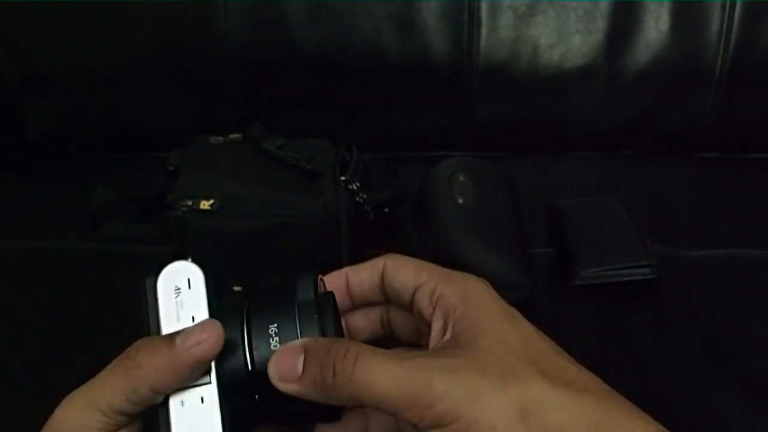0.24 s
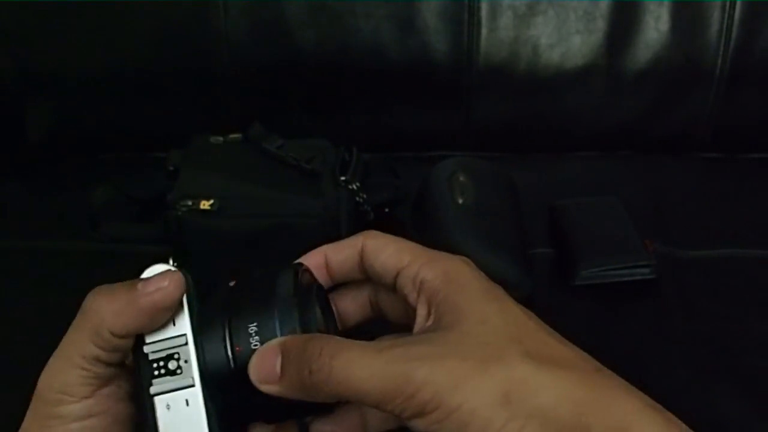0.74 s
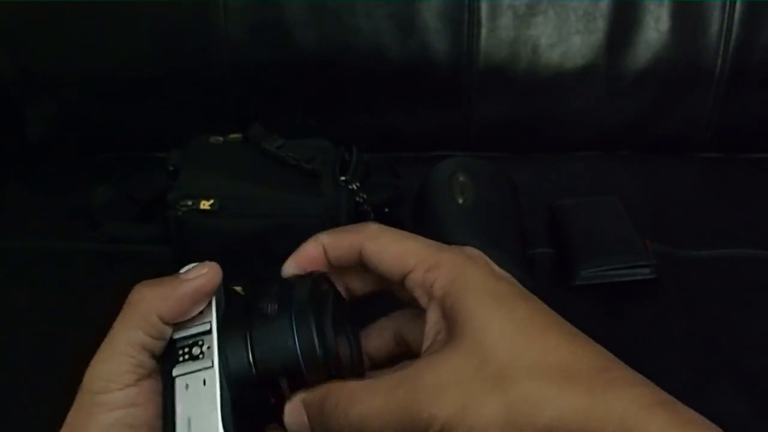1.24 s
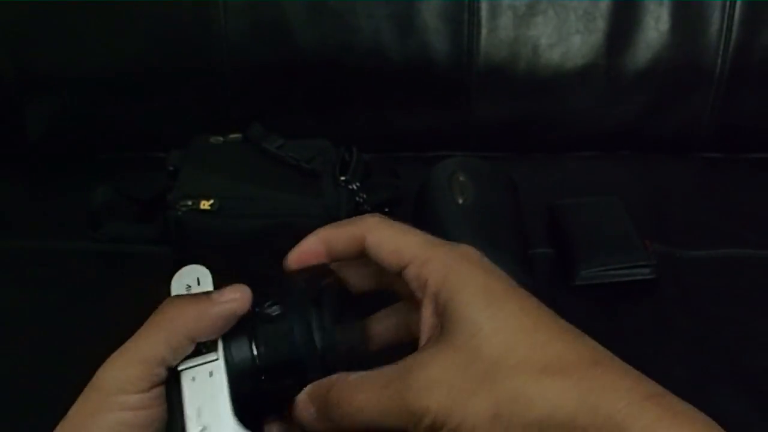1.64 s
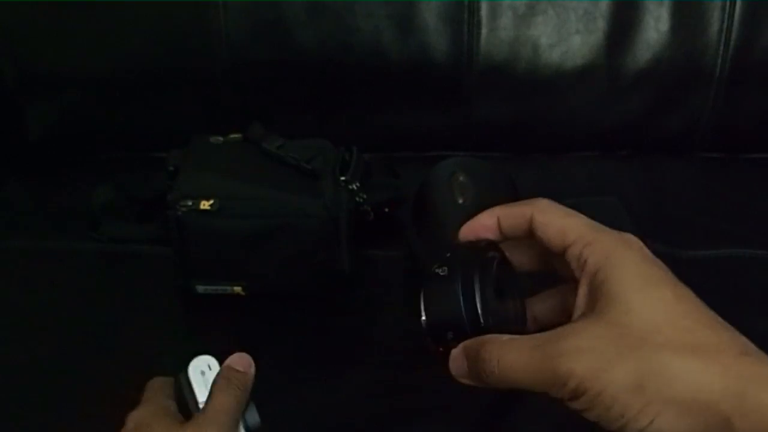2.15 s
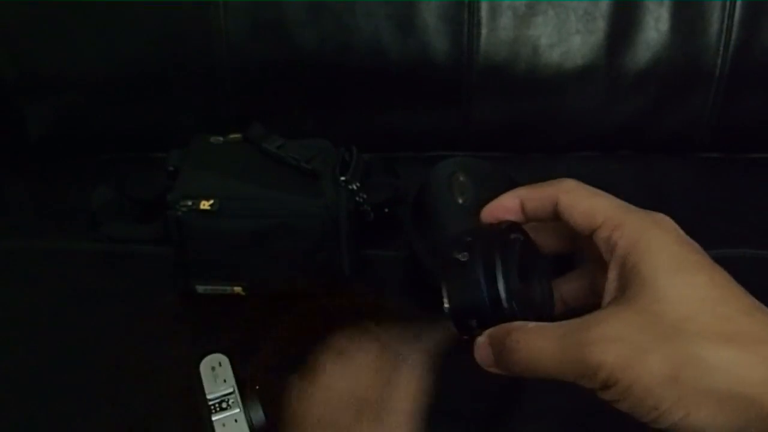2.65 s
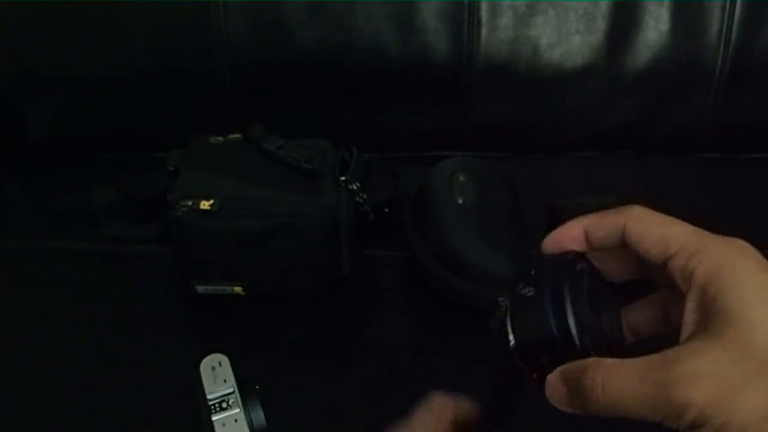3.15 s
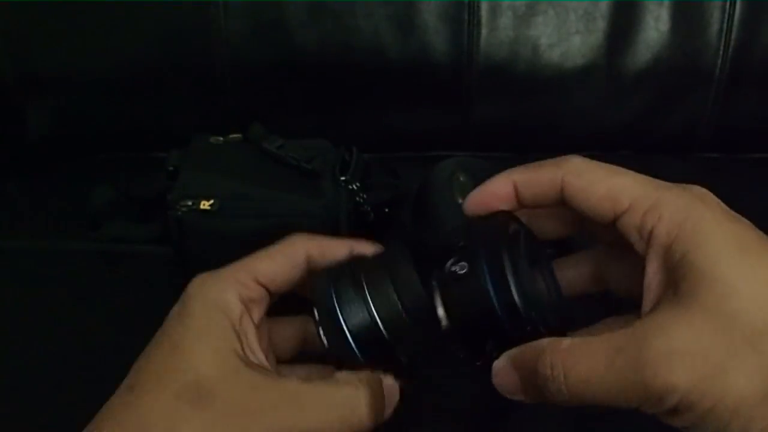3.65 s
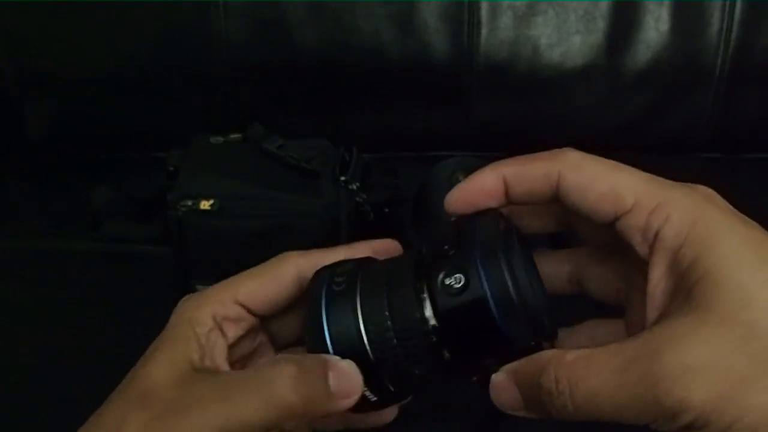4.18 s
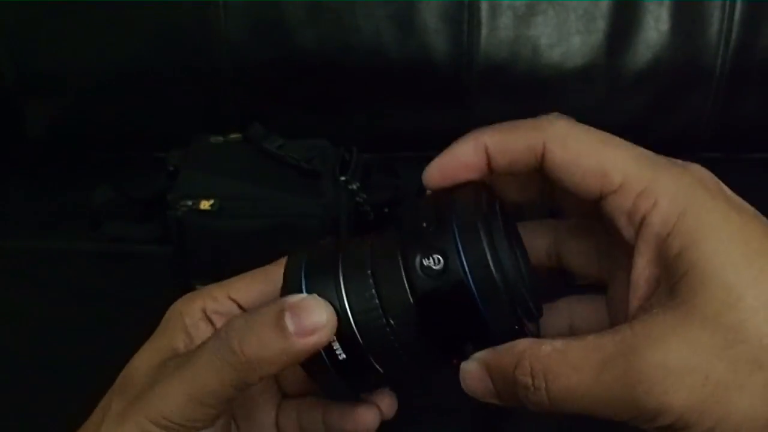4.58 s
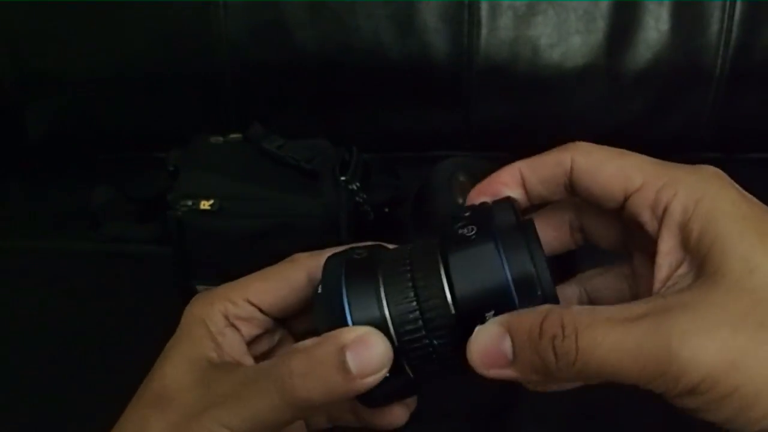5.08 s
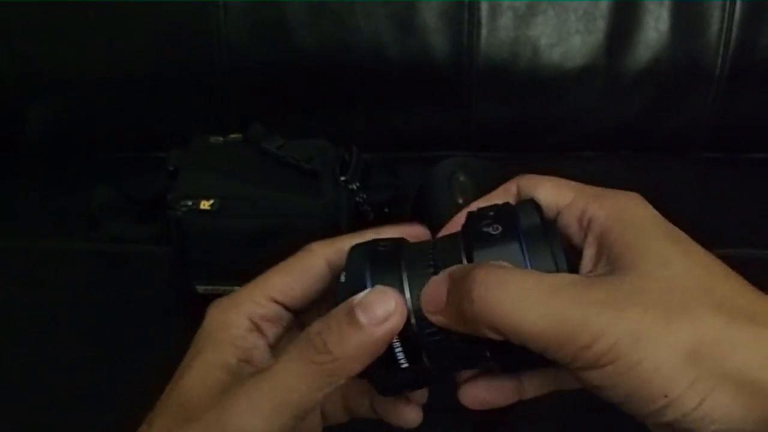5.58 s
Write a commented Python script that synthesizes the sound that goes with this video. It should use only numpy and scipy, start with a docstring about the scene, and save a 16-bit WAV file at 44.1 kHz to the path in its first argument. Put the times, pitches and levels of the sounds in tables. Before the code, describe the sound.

A faint fan and steady air fill a small room, heard in stereo from about an arm's length. Hands work a camera lens: light ticks and finger rubs, then a faint, rough, falling squeak around 0.4 seconds. The tight mount ticks as it slips, clicks near 0.9 and 1.2 seconds, and releases with a cluster of sharp clacks at about 1.6. Soft bumps on a sofa cushion and a few small clicks follow until about 3 seconds. At 3.25 the lens clacks sharply against a second barrel, and the metal rings slide with a faint hiss and scrape from 3.5 to 4. A quick run of clicks with tiny spring pings leads to the loudest snap at 4.4 seconds as it locks. Faint rubbing and light ticks continue until about 5.8. Each knock leaves a short room tail.

```python
"""A small, quiet room with a sofa and a faint fan; a stereo microphone about an arm's length from the hands.
They twist a lens off a small camera, lay the body on the cushion and lock the lens onto a second barrel.
Bayonet lugs and a sprung catch click, clack and ping, fingers rub the grips, the tight twist squeaks
and the metal rings hiss as they slide on each other. The room answers each knock with a short tail."""
import sys
import numpy as np
from scipy import signal
from scipy.fft import rfft, irfft, next_fast_len
from scipy.io import wavfile
from scipy.ndimage import map_coordinates

SR = 44100
rng = np.random.default_rng(int(sys.argv[2]) if len(sys.argv) > 2 else 0)


def file_out(sig):
    """Save sig as 16-bit WAV at sys.argv[1]."""
    # one column per channel
    cols = np.atleast_2d(sig).T
    # limit, then scale
    lim = np.clip(cols, -1, 1)
    pcm = np.round(lim * 32767).astype(np.int16)
    wavfile.write(sys.argv[1], SR, pcm)


N = 256662

# single contacts of lugs, catch and barrels: t/s, relative level/dB, brightness/(dB/octave), crack t60/s
CLICKS = [(0.2554, -40.5, 3, .012), (0.3047, -39, -1.5, 0.017), (0.3328, -41.5, -2.5, .016),
          (0.803, -36.5, 9.5, 0.017), (1.2008, -30.5, 4, 0.031), (1.2433, -34, 3, 0.045),
          (1.5547, -16, 2, 0.035), (1.5825, -20.5, 2, 0.018), (1.8103, -43.5, 1, 0.018),
          (2.0237, -38, -4, 0.026), (2.0375, -30, 2.5, 0.048), (2.1707, -48, -5, 0.024),
          (3.015, -41.5, -4, 0.017), (3.249, -13, -0.5, 0.037), (3.2754, -24.5, 2, 0.014),
          (4.0237, -25.5, -1, .016), (4.0458, -32, -2, 0.014), (4.0863, -20.5, 3, 0.017),
          (4.1025, -35, -6.5, 0.018), (4.1672, -19.5, 1, 0.02), (4.41, -19, -2, 0.0033),
          (4.4127, -8, 0, 0.013), (4.4429, -33, 2, 0.007), (4.72, -39.5, 5, .018),
          (5.1587, -38.5, 0.5, .029), (5.3418, -46.5, -1.5, 0.018), (5.7395, -40.5, -1, 0.024),
          (5.7617, -38.5, 0.5, 0.028)]
# a part skips over its seat: the same four columns, then count, gap/s, loss per skip/dB
SKIPS = [(0.9034, -27, 9, 0.036, 2, 0.011, 4), (1.1481, -27.5, 1.5, 0.053, 3, 0.0066, 2.5),
         (1.5916, -19, 4, 0.037, 4, .0045, 1.1), (3.3317, -32, -2, .028, 2, 0.0057, -2.5),
         (3.9914, -18.5, -2, 0.03, 3, .0108, 6.5), (4.4562, -20.5, -0.5, 0.0073, 2, 0.0087, -0.5),
         (5.7784, -30.5, -2, 0.025, 3, 0.0053, 4.5)]
# the tight bayonet sticks and slips: t/s
SLIP_TIMES = [0.5776, 0.6202, 0.632, 0.6443, 0.662, 0.6832, 0.7311, 0.7553]
# how strongly each part speaks in the registers: knock/dB, ring/dB, tock/dB, clack/dB, tick/dB
CAMERA_VOICE = (-32.5, -19, -24, -23, -32.5)
BARREL_VOICE = (-36.5, -20.5, -22, -23, -26)
SLIP_VOICE = (-47, -29.5, -23, -21, -34)
SWAP_S = 2.5  # the hands go from the camera to the barrels


def bayonet_hits(slip_db=-43, growth_db_per_s=92, slip_t60=0.011):
    """Lugs click, skip and slip harder as the twist builds: t/s, level/dB, brightness, t60/s, voice."""
    hits = list(CLICKS)
    for s, db, bright, t60, count, gap, loss in SKIPS:
        hits += [(s + k * gap, db - k * loss, bright, t60) for k in range(round(count))]
    slips = [(s, slip_db + growth_db_per_s * (s - SLIP_TIMES[0]), 0, slip_t60, SLIP_VOICE)
             for s in SLIP_TIMES]
    return [(*hit, CAMERA_VOICE if hit[0] < SWAP_S else BARREL_VOICE) for hit in hits] + slips


# modes of the camera with its lens, and of the two joined barrels: f/Hz, relative level/dB, t60/s
CAMERA_MODES = [(426, 5.5, 0.0082), (910, -9.5, 0.016), (1080, 0, 0.016), (1211, -16, 0.086),
                (2290, 2, 0.014), (3080, 1.5, 0.008), (3490, -2, 0.014), (4020, -0.5, 0.012)]
BARREL_MODES = [(389, -20.5, 0.072), (660, -5, 0.026), (1040, -6, 0.029), (1144, -20, 0.087),
                (1330, -20.5, 0.025), (2003, -6.5, 0.034), (3020, -4.5, 0.014), (4190, -12.5, 0.023),
                (4324, -9, 0.053), (5160, -7.5, 0.016), (8370, -15, 0.01)]
# knock, ring, tock, clack and tick registers: low f/Hz, high f/Hz
REGISTERS = [(220, 590), (830, 1420), (1600, 2550), (2900, 5700), (5700, 17000)]


def bayonet(pivot_hz=4000, delay_s=.0006, port_lag_s=.000014):
    """Clicks and clacks at arm's length: blunt ones favour the low registers, sharp ones the treble."""
    out, t, tails = np.zeros((2, N)), np.arange(SR // 20) / SR, room_tails()
    bands = [signal.butter(3, edges, 'band', fs=SR, output='sos') for edges in REGISTERS]
    octaves = np.log2(np.array(REGISTERS) / pivot_hz).mean(axis=1)
    for s, db, bright, t60, voice in bayonet_hits():
        body, side = (CAMERA_MODES, -1) if s < SWAP_S else (BARREL_MODES, 1)
        blow = strike(body, t, t60)
        levels = db + np.array(voice) + bright * octaves
        click = sum(amp(level) * unit(signal.sosfilt(band, blow)) for band, level in zip(bands, levels))
        # the camera reaches the left microphone port first, the barrels the right
        pair = filtered(click, lambda hz: np.exp(1j * np.pi * side * port_lag_s * np.outer([-1, 1], hz)))
        add(out, s + delay_s, in_room(pair, tails, tail_db=-8, early_db=-14.5))
    return out


# spectrum of a hard contact: f/Hz, relative level/dB
CRACK_SPECTRUM = [(100, -9), (320, -2.5), (620, 9.5), (1000, 3), (2500, 8.5), (4600, 2), (6500, 2.5),
                  (8500, 3.5), (12500, -1.5), (16000, -7.5)]
# close sound at the microphone: f/Hz, left-right likeness/0-1
NEAR_LIKENESS = [(300, .99), (1200, 0.95), (3000, 0.72), (8000, 0.63), (15000, 0.84)]


def strike(body, t, crack_t60, snap_t60=0.0016, rattle_t60=0.44, rise_s=0.0001):
    """One contact: a hard snap, a short crack, a fine rattle of loose parts and the ring of the body."""
    snap = amp(13 - 60 * t / snap_t60)
    crack = amp(2 - 60 * t / crack_t60)
    rattle = amp(-23 - 60 * t / rattle_t60)
    ring = ringing(body, t)
    burst = (snap + crack + rattle) * noise(CRACK_SPECTRUM, NEAR_LIKENESS, len(t))
    return (ring + burst) * (1 - np.exp(-t / rise_s))


def ringing(modes, t, detune=0.032):
    """Damped modes whose pitch and strength shift a little with the grip."""
    hz, db, t60 = np.transpose(modes)[:, :, None]
    shift, strength = rng.standard_normal((2, len(modes), 1))
    decay = amp(db + 2 * strength - 60 * t / t60)
    return np.sum(decay * np.sin(2 * np.pi * hz * (1 + detune * shift) * t), axis=0)


# sprung parts letting go or snapping home: t/s, f/Hz, level/dB, t60/s
SPRING_PINGS = [(0.906, 2740, -55, .03), (0.915, 5540, -28.5, 0.029), (3.993, 2900, -23, 0.024),
                (4.087, 2420, -25, 0.031), (4.169, 4150, -29, 0.01), (4.413, 712, -30, 0.037),
                (4.413, 4460, -20.5, 0.028), (4.413, 5240, -47, 0.017), (5.342, 4050, -45, 0.023),
                (5.343, 5370, -48, .03)]


def springs():
    """Sprung catches give a brief, buzzing ping."""
    out, t, tails = np.zeros((2, N)), np.arange(SR // 10) / SR, room_tails(count=3)
    buzz = wobble(700)
    for s, hz, db, t60 in SPRING_PINGS:
        phase = 2 * np.pi * hz * t + buzz[round(s * SR):][:len(t)]
        ping = amp(db - 60 * t / t60) * np.sin(phase)
        add(out, s, in_room(ping, tails, tail_db=-13, early_db=-12))
    return out


# mount rings sliding on each other: t/s, hold/s, relative level/dB, scrape over hiss/dB
RING_SLIDES = [(3.565, 0.0068, -50.5, -1.5), (3.643, 0.033, -47.5, 5), (3.766, 0.012, -60, 8.5),
               (3.836, 0.026, -53, 1), (3.973, 0.057, -47, 3), (5.178, 0.11, -60.5, -13)]
# resonances of the rings: f/Hz, width/Hz, relative level/dB
RING_RESONANCES = [(5710, 45, 12), (7860, 130, 6), (8600, 92, 6), (10000, 120, 0), (12000, 130, 3),
                   (14100, 200, 8)]
# spectra of their hiss and scrape: f/Hz, relative level/dB
HISS_SPECTRUM = [(3000, -15), (5500, -6), (7000, -4), (8000, 2), (8700, -5), (9700, -4), (12000, -8),
                 (14200, -14), (16000, -25)]
SCRAPE_SPECTRUM = [(200, -11), (700, -11), (1050, 3.5), (1700, 1.5), (2100, -9), (2500, 2), (3000, -4),
                   (4300, -8.5), (7000, -43)]


def mount_rings(hiss_db=-1, sheen_db=-2, scrape_db=-1, attack=0.046, release=0.067):
    """Metal faces hiss and sing as they slide, and scrape through the barrel when pressed."""
    speed = sum(stroke(s, hold, db, attack, release) for s, hold, db, _ in RING_SLIDES)
    pressure = sum(stroke(s, hold, db + scrape + scrape_db, attack, release)
                   for s, hold, db, scrape in RING_SLIDES)
    # as the point of contact wanders, the resonances fade in and out
    sheen = unit(friction(RING_RESONANCES, grain_db=3, rate=600) * amp(3 * wobble(20)))
    metal = amp(hiss_db) * noise(HISS_SPECTRUM, DIFFUSE_LIKENESS, N) + amp(sheen_db) * sheen
    grit = unit(amp(3 * wobble(900)))
    return grit * (speed * metal + pressure * noise(SCRAPE_SPECTRUM, DIFFUSE_LIKENESS, N))


# fingers on the grips: t/s, hold/s, relative level/dB
FINGER_RUBS = [(0.236, 0.012, -51), (0.576, 0.073, -53), (1.408, 0.0061, -47.5), (1.555, 0.0074, -35),
               (2.197, .025, -49), (2.982, 0.081, -55), (5.162, 0.17, -55), (5.757, .05, -50.5)]
# spectrum of rubbing skin: f/Hz, relative level/dB
SKIN_SPECTRUM = [(200, -22), (700, -6), (1150, 9.5), (1700, 7), (2600, 2.5), (3600, 5.5), (5200, 0),
                 (8500, -3.5), (13000, -13), (16000, -13)]


def fingers(gain_db=-3, grain_db=3):
    """Skin catches and slips on the ribbed grips."""
    pressure = sum(stroke(s, hold, db, attack=0.018, release=0.061) for s, hold, db in FINGER_RUBS)
    skin = noise(SKIN_SPECTRUM, DIFFUSE_LIKENESS, N) * amp(grain_db * wobble(350))
    return amp(gain_db) * pressure * unit(skin)


def squeak(at_s=.42, pitch_hz=3670, sag_hz_per_s=2300, jitter=0.03, attack=0.14, release=0.23):
    """As the lens starts to turn, the tight grip gives a rough, falling squeak over a dry rub."""
    hz = pitch_hz - sag_hz_per_s * np.clip(np.arange(N) / SR - at_s, -attack, release)
    tone = np.array([wobble(300) * np.sin(2 * np.pi * np.cumsum(hz * (1 + jitter * wobble(900))) / SR)
                     for _ in range(2)])
    rub = friction([(1170, 190, -4), (3360, 950, -13), (4600, 280, -11)], grain_db=1.5, rate=400)
    twist = stroke(at_s, hold=0.059, db=-53.5, attack=attack, release=release)
    return twist * (amp(-4) * unit(tone) + amp(-2) * rub)


def friction(resonances, grain_db, rate):
    """Uneven micro-slips, rms 1, sounding through resonances: f/Hz, width/Hz, relative level/dB."""
    slips = noise(CRACK_SPECTRUM, DIFFUSE_LIKENESS, N) * amp(grain_db * wobble(rate))
    power = lambda f: sum(amp(2 * db) / (1 + ((f - hz) / width) ** 2) ** 2 for hz, width, db in resonances)
    return unit(filtered(slips, lambda f: np.sqrt(power(f))))


# camera and lenses bump on cushion or palm: t/s, relative level/dB
SOFT_BUMPS = [(1.665, -45.5), (1.781, -39.5), (1.832, -48), (2.044, -57), (2.091, -50.5), (2.172, -47.5),
              (2.814, -52.5), (2.861, -52), (5.78, -47)]
# modes of the camera body on the cushion: f/Hz, relative level/dB, t60/s
THUD_MODES = [(204, -11, 0.072), (316, -6.5, 0.043), (371, 8, 0.019), (455, -6.5, 0.043)]


def bumps(rise_s=0.0061, gain_db=-11):
    """The cushioned body thuds with a few low, damped modes."""
    out, t, tails = np.zeros((2, N)), np.arange(SR // 10) / SR, room_tails(count=3)
    for s, db in SOFT_BUMPS:
        thud = ringing(THUD_MODES, t, detune=0.084) * (1 - np.exp(-t / rise_s))
        add(out, s, in_room(amp(db + gain_db) * unit(thud), tails, tail_db=-5.5, early_db=-18))
    return out


# hand and camera press on the sofa: t/s, hold/s, relative level/dB
CUSHION_PRESSES = [(1.65, 0.23, -70.5), (2.02, 0.038, -52.5), (2.816, .04, -57)]


def cushion(gain_db=-2):
    """The upholstery gives way with a low, lumpy rumble."""
    weight = sum(stroke(s, hold, db, attack=.05, release=0.18) for s, hold, db in CUSHION_PRESSES)
    rumble = friction([(101, 20, 7), (184, 50, 2.5), (348, 66, -3)], grain_db=7, rate=13)
    return amp(gain_db) * weight * rumble


def in_room(x, tails, tail_db, early_db, early_t60=0.22, gap_s=0.0038):
    """The microphone hears the direct sound, the quick answer of nearby furniture and the room's tail."""
    tail = tails[rng.integers(len(tails))]
    t, size = np.arange(tail.shape[1]) / SR, SR // 8
    arrive = np.clip(t / gap_s - 1, 0, 1)
    answer = amp(tail_db) * unit(tail * arrive) / np.sqrt(len(t))
    early = noise(CRACK_SPECTRUM, NEAR_LIKENESS, size) * amp(-60 * t[:size] / early_t60) * arrive[:size]
    answer[:, :size] += amp(early_db) * unit(early) / np.sqrt(size)
    answer[:, 0] += 1  # the direct path
    return signal.fftconvolve(np.atleast_2d(x), answer, axes=1)


# colour of the room's tail: f/Hz, relative level/dB
ROOM_SPECTRUM = [(100, -2), (400, 1), (720, -9.5), (980, -4.5), (1170, 4.5), (1450, 5), (2100, -1),
                 (3000, 0.5), (4400, -0.5), (8000, 2), (15000, 3)]
# its decay: f/Hz, t60/s
ROOM_DECAY = [(200, 0.46), (550, 1), (1200, 0.74), (3700, 0.65), (9700, 0.5), (15000, 0.38)]
# diffuse sound at the microphone: f/Hz, left-right likeness/0-1
DIFFUSE_LIKENESS = [(60, 0.59), (300, 0.72), (700, 0.63), (1400, 0.23), (3000, 0.098), (7000, 0.094)]


def room_tails(count=8):
    """A few random variants of the room's diffuse tail; each frequency dies at its own speed."""
    washes = [noise(ROOM_SPECTRUM, DIFFUSE_LIKENESS, SR * 2 // 3) for _ in range(count)]
    hz, times, spectra = signal.stft(washes, SR, nperseg=256)
    decay = amp(-60 * times / along(ROOM_DECAY, hz)[:, None])
    return signal.istft(spectra * decay, SR, nperseg=256)[1]


# the room's air: f/Hz, relative level/dB
AIR_SPECTRUM = [(25, -16), (50, -10.5), (90, -4.5), (200, -3), (400, 0), (680, -7), (1200, 0), (2100, -4),
                (2700, -10), (4000, -11), (5300, -18.5), (8000, -19.5), (14500, -30), (16000, -38)]
# the fan in the background: f/Hz, level/dB
FAN_TONES = [(414.5, -66), (1125, -75.5)]


def room_tone(air_db=-52.5, waver_rad=0.97):
    """Steady air noise and the faint, slightly wavering tones of a fan."""
    t = np.arange(N) / SR
    hum = sum(amp(db + wobble(10)) * np.sqrt(2) * np.sin(2 * np.pi * hz * t + waver_rad * wobble(5))
              for hz, db in FAN_TONES)
    return amp(air_db) * noise(AIR_SPECTRUM, DIFFUSE_LIKENESS, N) + hum


def stroke(s, hold, db, attack, release):
    """Gain of a hand movement: it swells, holds and fades; attack and release are seconds per 20 dB."""
    t = np.arange(N) / SR
    return amp(db - 20 * np.maximum(s - t, 0) / attack - 20 * np.maximum(t - s - hold, 0) / release)


def noise(spectrum, likeness, size):
    """Coloured stereo noise of rms 1."""
    def mid_side_gains(hz):
        angle = np.arccos(np.clip(along(likeness, hz), -1, 1)) / 2
        return amp(along(spectrum, hz)) * np.array([np.cos(angle), np.sin(angle)])
    mid, side = filtered(rng.standard_normal((2, size)), mid_side_gains)
    return unit(np.array([mid + side, mid - side]))


def filtered(x, response):
    """x times a response of frequency."""
    size = x.shape[-1]
    padded = next_fast_len(size + 2048)
    return irfft(rfft(x, padded) * response(np.fft.rfftfreq(padded, 1 / SR)), padded)[..., :size]


def wobble(rate):
    """A smooth random curve, rate knots a second."""
    return map_coordinates(rng.standard_normal(int(N * rate / SR) + 4), [np.arange(N) * rate / SR])


def along(points, hz):
    """Interpolate (f/Hz, value) points on a log axis."""
    f, values = np.transpose(points)
    return np.interp(np.log(hz + 1), np.log(f + 1), values)


def add(track, s, sound):
    """Mix a sound in at time s."""
    part = track[:, max(round(s * SR), 0):][:, :sound.shape[-1]]
    part += sound[..., :part.shape[-1]]


def amp(db):
    """Decibels to gain."""
    return 10 ** (np.asarray(db) / 20)


def unit(x):
    """Scale to rms 1."""
    return x / np.sqrt(np.mean(x ** 2) + 1e-20)


# the hands in the stereo image: f/Hz, left minus right/dB
HAND_BALANCE = [(700, -0.5), (1300, 0), (2400, -1), (4400, -1.5), (8000, -2.5)]


def scene():
    """The hands work a little to the right of the microphone, over the room tone."""
    hands = bayonet() + springs() + bumps() + cushion() + fingers() + squeak() + mount_rings()
    placed = filtered(hands, lambda hz: amp(np.outer([.5, -.5], along(HAND_BALANCE, hz))))
    return placed + room_tone()


# dips in the microphone's response: f/Hz, half width/Hz, depth/dB
MIC_DIPS = [(1558, 303, 4.5), (2480, 267, 4), (5870, 570, 7.5), (11003, 686, 29.5)]


def record(dry, roll_hz=15100, top_hz=16400):
    """The microphone has a few narrow dips; the sound is low-passed near 16 kHz."""
    def response(hz):
        dips_db = sum(depth * np.exp(-((hz - centre) / width) ** 2) for centre, width, depth in MIC_DIPS)
        return amp(-dips_db) / np.sqrt(1 + (hz / roll_hz) ** 40) * (hz < top_hz)
    return filtered(dry, response)


dry = scene()
out = record(dry)
file_out(out)
```